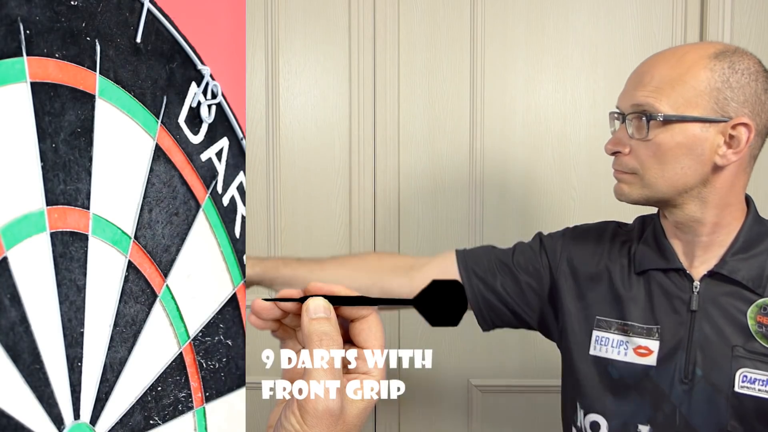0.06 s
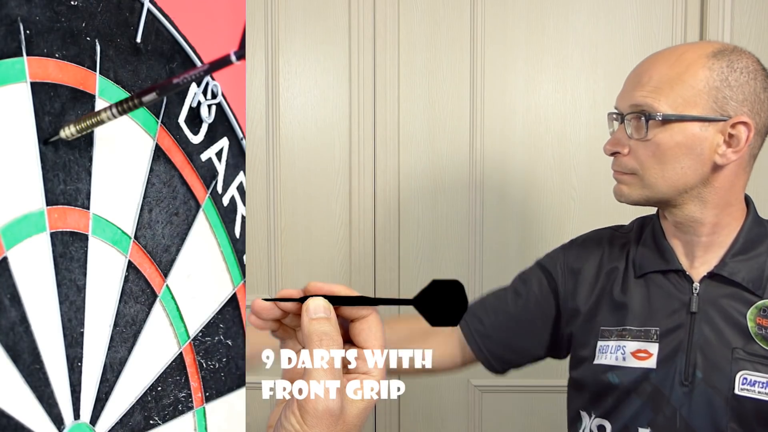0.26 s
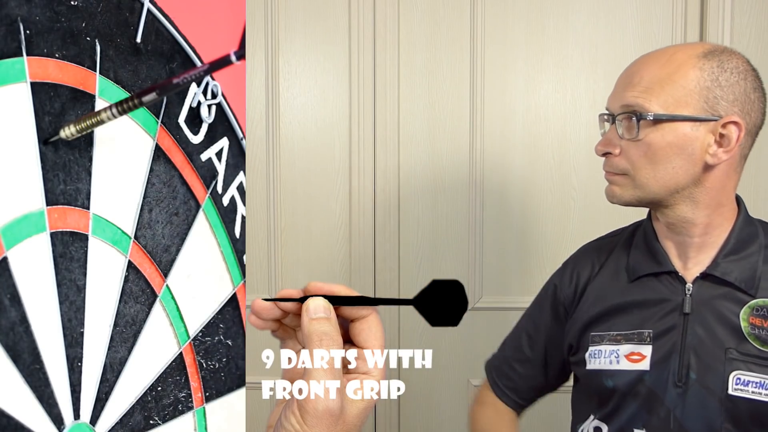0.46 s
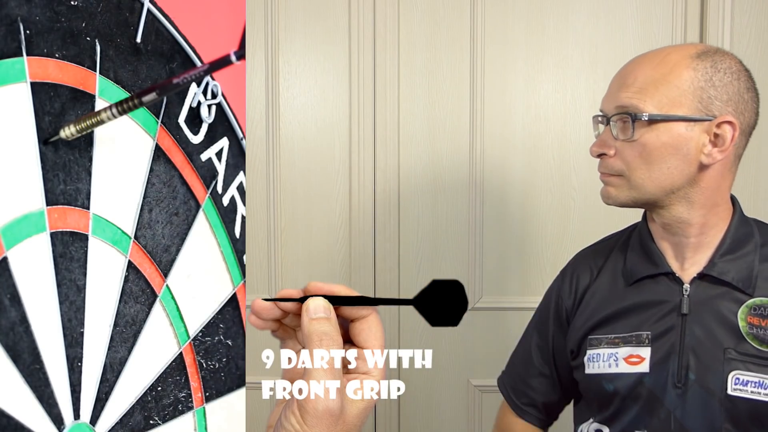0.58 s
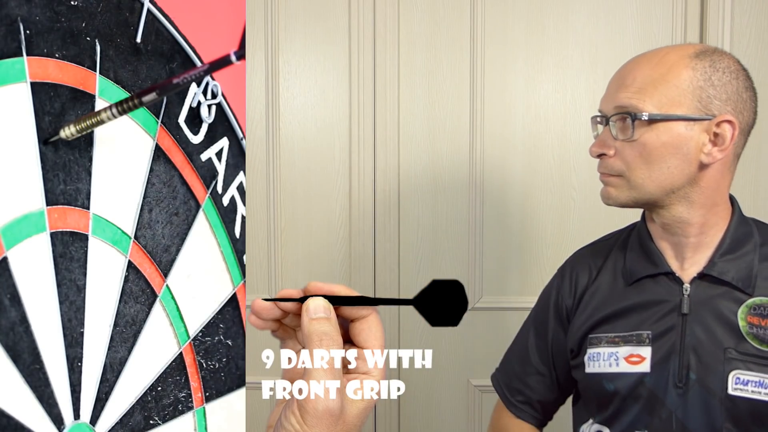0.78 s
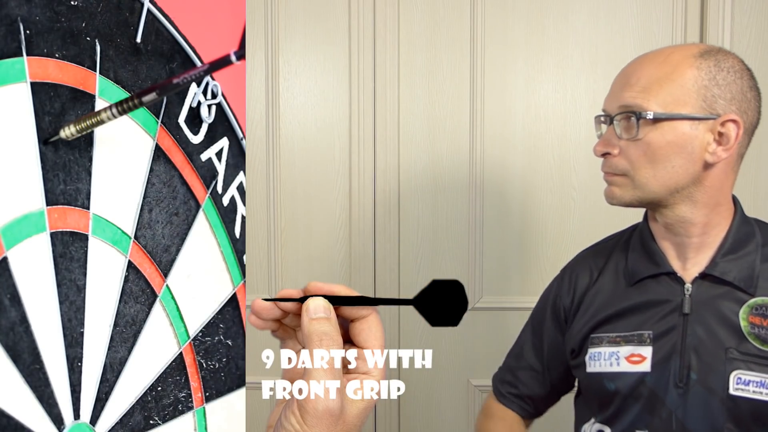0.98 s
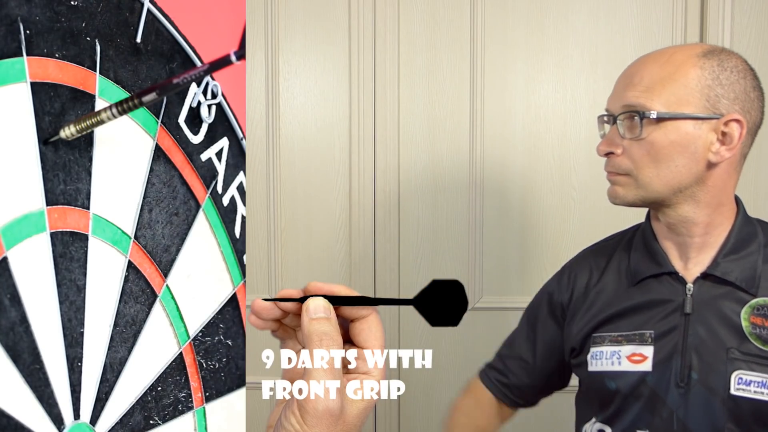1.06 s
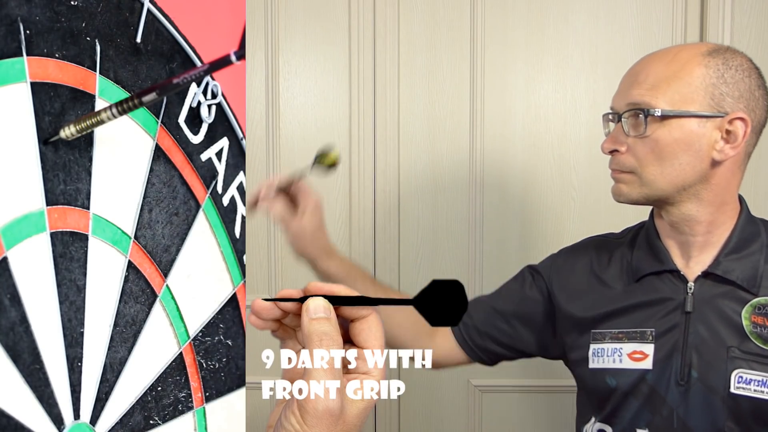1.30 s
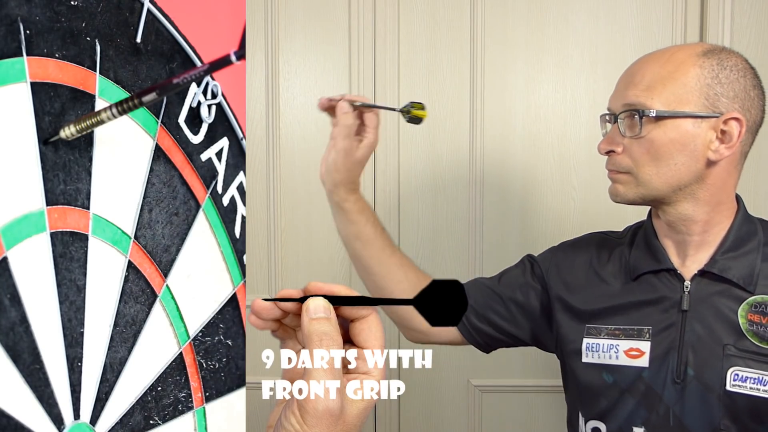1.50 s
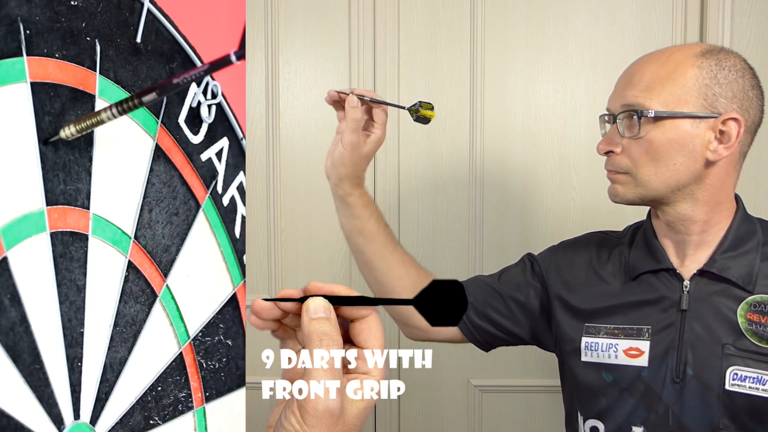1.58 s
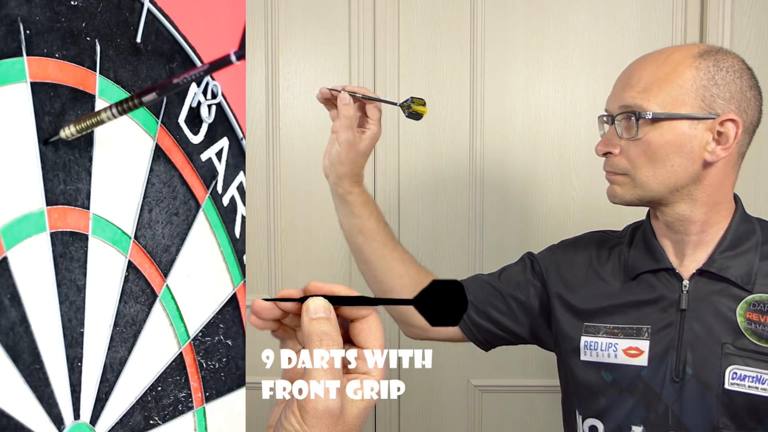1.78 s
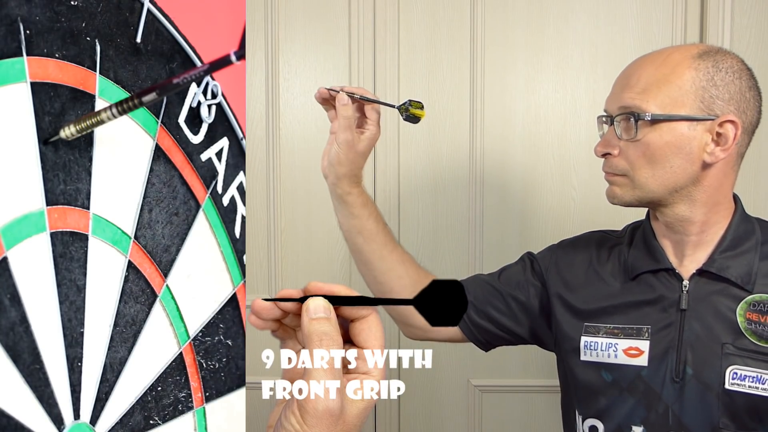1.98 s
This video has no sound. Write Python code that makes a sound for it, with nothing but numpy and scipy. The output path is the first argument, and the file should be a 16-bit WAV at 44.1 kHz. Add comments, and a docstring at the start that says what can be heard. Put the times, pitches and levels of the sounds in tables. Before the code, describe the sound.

A steel-tip dart lands in a bristle board at about 0.24 seconds: a faint touch and sharp tick, then a solid, hollow thud with a woody ring and quick wall echoes, dying within about half a second. A low wavering hum and soft hiss run throughout. Faint cloth rustles come at the start and near 0.7 seconds, with tiny finger ticks at 1.62 and 1.74.

```python
"""A low wavering hum and hiss open the scene, with a faint sleeve rustle: all shaped noise.
Then a steel-tip dart lands in a bristle board hung in a small, bare room.
A faint touch and the tick of the point, decaying noise bursts, lead into the thud of the blow.
The board and its backing ring as decaying sines; wall echoes and a dense noise tail answer.
A second rustle and two faint finger ticks follow as the next dart is readied."""
import sys
import numpy as np
from scipy import signal
from scipy.fft import rfft, irfft
from scipy.io import wavfile

SR = 44100
rng = np.random.default_rng(int(sys.argv[2]) if len(sys.argv) > 2 else 0)


def generate_wav(signal):
    """Clip the signal to [-1, 1] and save it as 16-bit WAV at the path in sys.argv[1]."""
    frames = np.transpose(np.atleast_2d(signal))
    scaled = np.clip(frames, -1, 1) * 32767
    pcm = np.round(scaled).astype(np.int16)
    wavfile.write(sys.argv[1], SR, pcm)


N = 90404
HIT_S = 0.241  # the dart lands


def undb(db):
    """Decibels to gain."""
    return 10 ** (np.asarray(db) / 20)


def curve(points, hz, axis=1):
    """One column of a table, interpolated along log frequency."""
    rows = np.array(points, float)
    return np.interp(np.log(hz + 1e-9), np.log(rows[:, 0]), rows[:, axis])


def bins():
    """Frequency of each spectral line in Hz."""
    return np.arange(N // 2 + 1) * SR / N


# Stereo width of everything struck in the room: (frequency [Hz], side minus mid [dB])
ROOM_WIDTH = [(60, -10), (200, -18.5), (380, -29.5), (700, -16), (1300, -7), (2400, -11.5), (4400, -8.5),
              (8000, -4.5)]


def noise(gain, width=ROOM_WIDTH):
    """Stereo noise of rms 1: independent mid and side spectra, shaped by gain and width."""
    mid, side = rfft(rng.standard_normal((2, N))) * gain
    side = side * undb(curve(width, bins()))
    stereo = irfft(np.array([mid + side, mid - side]), N)
    return stereo / stereo.std()


def coloured(points, width=ROOM_WIDTH):
    """Stereo noise of rms 1 whose spectrum follows a (frequency, level) table."""
    return noise(undb(curve(points, bins())), width)


def fade(start, t60, rise=0.0004, hold=0):
    """Exponential rise, then a 60 dB fall per t60 after the hold; all times in seconds."""
    age = np.maximum(np.arange(N) / SR - start, 0)
    attack = 1 - np.exp(-age / rise)
    decay = np.exp(-np.log(1000) * np.maximum(age - hold, 0) / t60)
    return attack * decay


# Hum bands: (centre [Hz], width [Hz], rms level [dB])
HUM_BANDS = [(390, 120, -68.5), (590.5, 31, -67.5)]


def hum():
    """Noise in two narrow bands, whose slow random beating makes the hum waver."""
    total = 0
    for centre_hz, width_hz, db in HUM_BANDS:
        resonance = 1 / (1 + ((bins() - centre_hz) / (width_hz / 2)) ** 2)
        total = total + undb(db) * noise(resonance)
    return total


# Colour of the hiss: (frequency [Hz], relative level per Hz [dB])
HISS_COLOUR = [(15, -0.5), (35, -6.5), (50, -16), (85, -16.5), (140, -13.5), (210, -7), (300, -12.5),
               (500, -11.5), (700, -13.5), (1100, -15.5), (2000, -20.5), (3400, -24.5), (4700, -20.5),
               (9300, -23.5), (15500, -29.5)]
# Stereo width of hiss and sleeve: (frequency [Hz], side minus mid [dB])
AIR_WIDTH = [(60, -14), (110, -8), (200, -4), (380, 1), (700, 5), (1290, 7), (2380, 2.5), (4400, -0.5),
             (8120, -4), (15000, -4.5)]


def hiss():
    """Steady broadband noise, heaviest in the lows."""
    return undb(-57.5) * coloured(HISS_COLOUR, AIR_WIDTH)


# Sleeve movements: (centre time [s], half length to 1/e [s], level [dB])
SLEEVE_MOVES = [(.01, 0.093, -57), (0.73, 0.067, -60.5)]
# Colour of the cloth: (frequency [Hz], relative level [dB])
CLOTH_COLOUR = [(500, 0), (3000, -9), (5000, -2.5), (8000, -10), (15000, -15)]


def sleeve():
    """Cloth rubs as the arm moves: noise swelling and fading in smooth humps."""
    t = np.arange(N) / SR
    swell = sum(undb(db) * np.exp(-((t - centre) / half) ** 2) for centre, half, db in SLEEVE_MOVES)
    return coloured(CLOTH_COLOUR, AIR_WIDTH) * swell


# Fingers on the next dart: (time [s], level [dB])
FINGER_TICKS = [(1.620, -59), (1.741, -56)]
# Colour of a finger tick: (frequency [Hz], relative level [dB])
FINGER_COLOUR = [(500, -17), (3300, -19), (4500, 8), (6000, -14), (15000, -21)]


def fingers():
    """Fingers tick on the next dart: bright noise bursts that die in milliseconds."""
    bursts = sum(undb(db) * fade(time, 0.024) for time, db in FINGER_TICKS)
    return coloured(FINGER_COLOUR) * bursts


# Colour of the room's ring: (frequency [Hz], relative level per Hz [dB])
ROOM_COLOUR = [(30, -38), (70, -28.5), (150, -22.5), (220, -10.5), (340, -4), (480, -2), (610, -11.5),
               (760, -7.5), (1350, -3), (1550, -13.5), (2800, -11.5), (3600, -22.5), (5000, -25.5),
               (6200, -42.5), (8500, -40), (9700, -34.5), (10800, -46), (15000, -63)]
# How long the ring hangs and dies: (frequency [Hz], hold [s], t60 [s])
ROOM_FADE = [(100, .02, 0.21), (250, .025, 0.54), (480, 0.033, 0.42), (1000, 0.077, .41), (1990, .03, 0.45),
             (4000, .015, .4), (8000, .01, .36)]


def room():
    """Dense reflections build up and die away, each octave at its own rate."""
    field = rfft(coloured(ROOM_COLOUR))
    octave = np.log2(np.maximum(bins(), 32) / 32)
    tail = 0
    for k in range(10):
        crossfade = np.maximum(1 - abs(octave - k), 0)  # triangular, overlapping octave bands
        band = irfft(field * crossfade, N)
        hz = 32 * 2 ** k
        hold, t60 = curve(ROOM_FADE, hz), curve(ROOM_FADE, hz, axis=2)
        tail = tail + band * fade(HIT_S, t60, rise=0.003, hold=hold)
    return undb(-18.5) * tail


# Colour of the first contact: (frequency [Hz], relative level [dB])
TOUCH_COLOUR = [(200, -22), (600, -0.5), (1100, -6.5), (1400, 1), (1900, -18.5), (2600, -12), (3600, -45),
                (15000, -55)]


def touch():
    """A light first contact, a noise burst, with a sine for the ping of the board."""
    ping = undb(-37) * np.sin(2 * np.pi * 1380 * np.arange(N) / SR)  # 1380 Hz
    contact = undb(-37.5) * coloured(TOUCH_COLOUR)
    return (ping + contact) * fade(HIT_S - 0.014, t60=0.12)


# Colour of the steel point: (frequency [Hz], relative level [dB])
TIP_COLOUR = [(500, 14.5), (3000, -17.5), (4800, -1), (6500, -5), (10000, 2), (12000, -7.5), (15000, -19)]


def tip():
    """The point cuts into the fibres: a short tick of noise just ahead of the blow."""
    return undb(-30) * coloured(TIP_COLOUR) * fade(HIT_S - 0.003616, t60=0.04, rise=0.001)


# Modes of the board and its backing: (frequency [Hz], level [dB], t60 [s])
BOARD_MODES = [(327, -22, .28), (379, -12, .26), (403, -28, .4), (360, -22, .6), (757, -24, .4),
               (860, -28, .35), (942, -25, .43), (1027, -27, .38), (1080, -27, .39), (1112, -28, .38),
               (1201, -29, .38), (1274, -28, .4), (1339, -23, .39), (1672, -35, .37)]


def board():
    """The stopping dart pushes the board inwards and sets its modes ringing as decaying sines."""
    age = np.arange(N) / SR - HIT_S
    ring = 0
    for hz, db, t60 in BOARD_MODES:
        ring = ring + undb(db) * np.sin(2 * np.pi * hz * age) * fade(HIT_S, t60, rise=0.001)
    return -ring  # inward push first


# Colour of the barrel's blunt blow: (frequency [Hz], relative level per Hz [dB])
THUD_COLOUR = [(40, -36), (150, -16), (250, -9), (350, -7), (550, -5.5), (900, -14.5), (1400, -7),
               (2000, -16.5), (3500, -34), (6000, -44), (15000, -69)]
# Wall echoes of the blow: (delay [s], level [dB], left minus right [dB])
WALL_ECHOES = [(.006, -2, 0), (.035, -7.5, -1), (.042, -8.5, -1.5), (.057, -1, -1)]


def thud():
    """The short blow as a noise burst, and its first returns from the walls as delayed copies."""
    blow = undb(-17) * coloured(THUD_COLOUR) * fade(HIT_S, t60=0.06)
    total = blow
    for delay, db, pan_db in WALL_ECHOES:
        gains = undb(db + np.array([[pan_db], [-pan_db]]) / 2)
        total = total + np.roll(blow, int(delay * SR), axis=1) * gains
    return total


def dart():
    """Touch, point, board and thud, thinned in the lows a board this small cannot radiate."""
    radiation = signal.butter(2, 149.6, "high", fs=SR, output="sos")  # corner in Hz
    return signal.sosfilt(radiation, touch() + tip() + board() + thud())


def scene():
    """One dart lands in the quiet room."""
    return dart() + room() + sleeve() + fingers() + hum() + hiss()


def record(dry):
    """A steep low-pass cuts the treble above 15650 Hz."""
    top_cut = signal.ellip(10, 0.1, 80, 15650, fs=SR, output="sos")  # 0.1 dB ripple, 80 dB stop
    return signal.sosfilt(top_cut, dry)


dry = scene()
out = record(dry)
generate_wav(out)
```